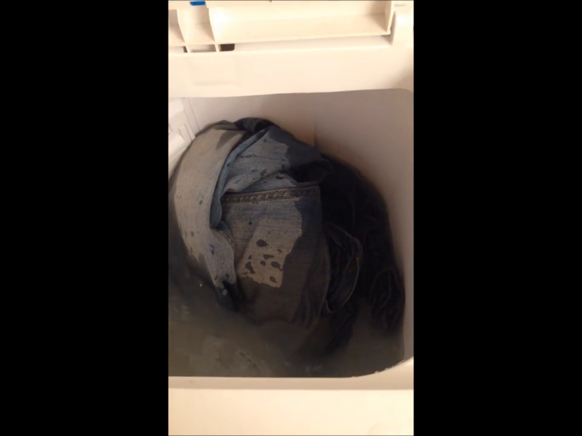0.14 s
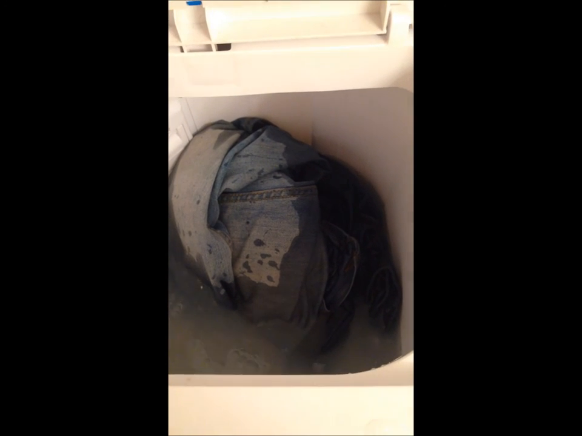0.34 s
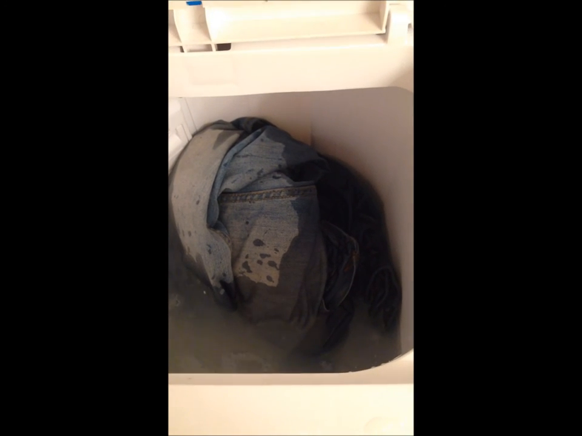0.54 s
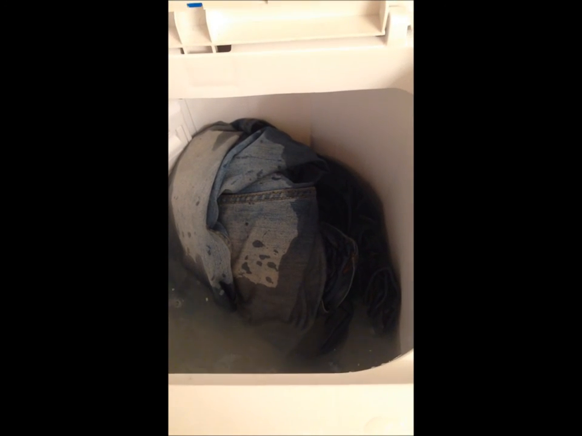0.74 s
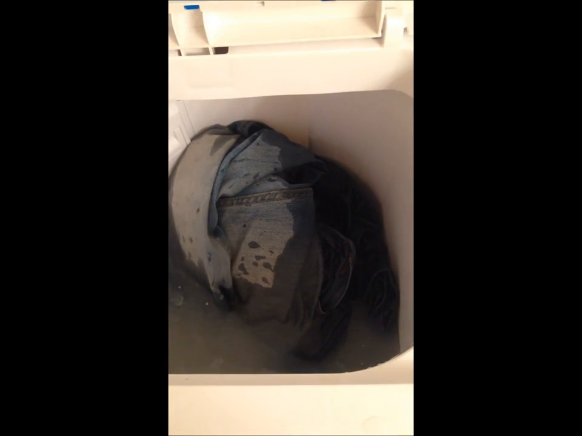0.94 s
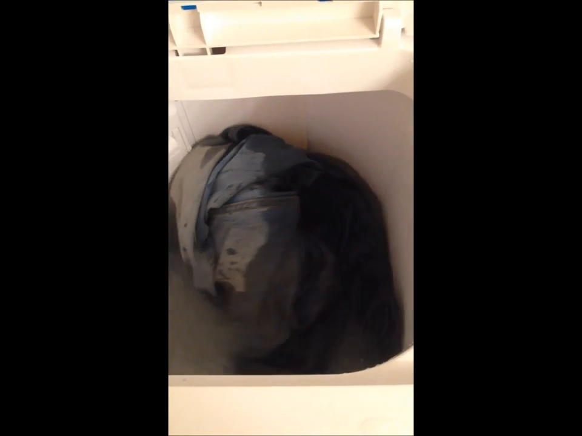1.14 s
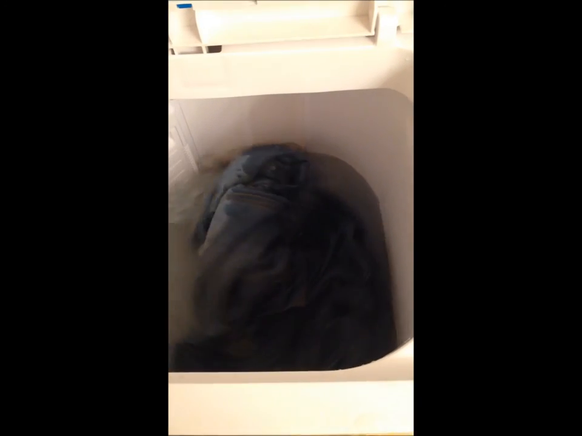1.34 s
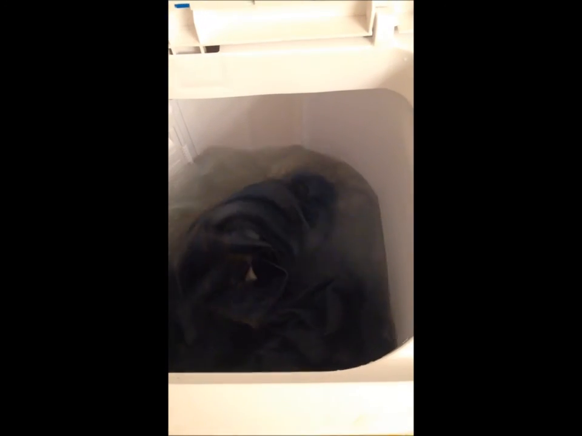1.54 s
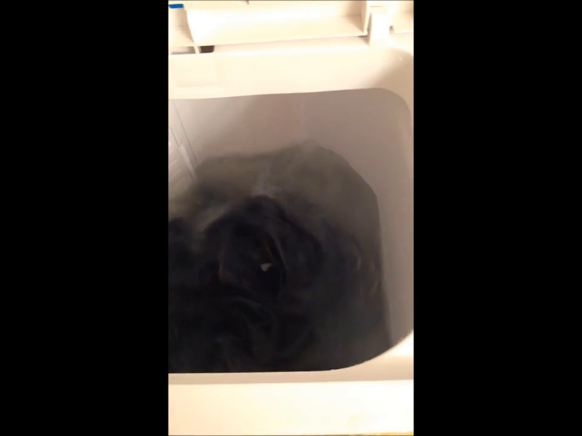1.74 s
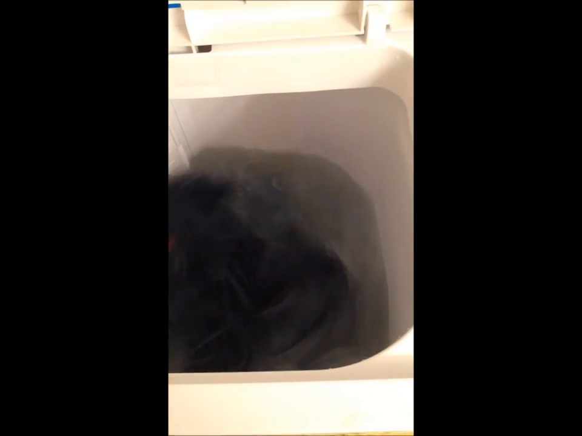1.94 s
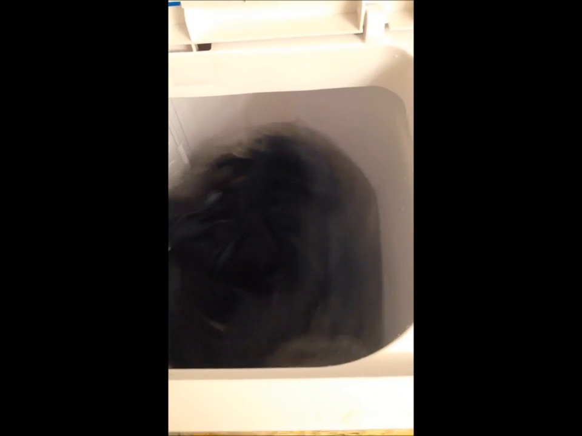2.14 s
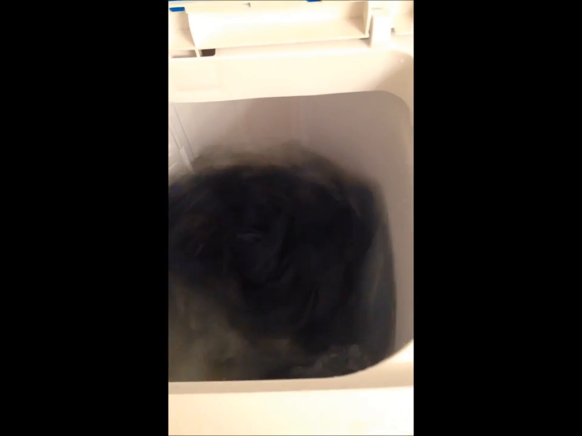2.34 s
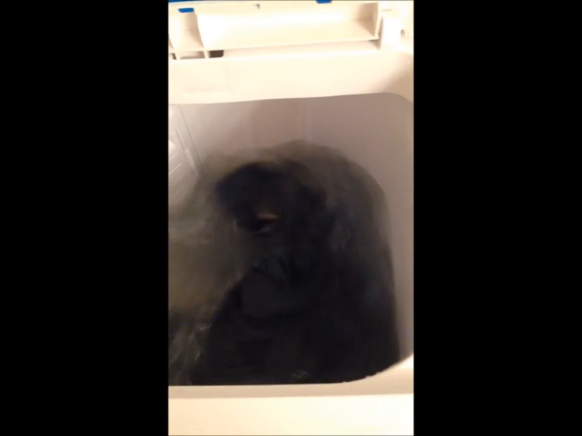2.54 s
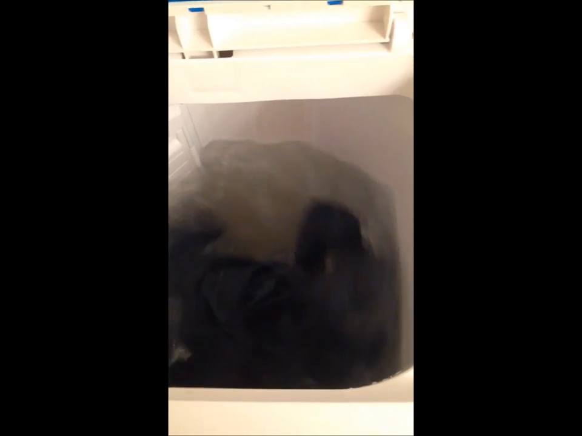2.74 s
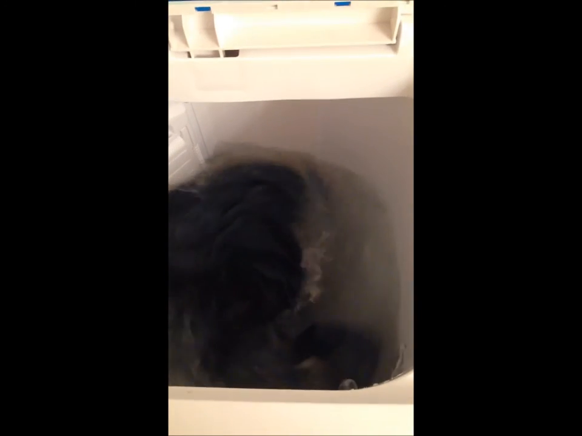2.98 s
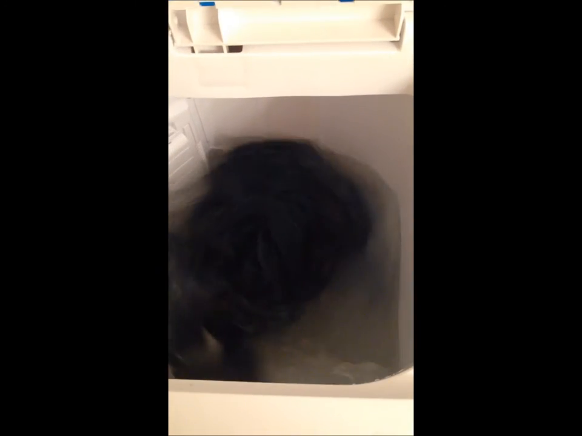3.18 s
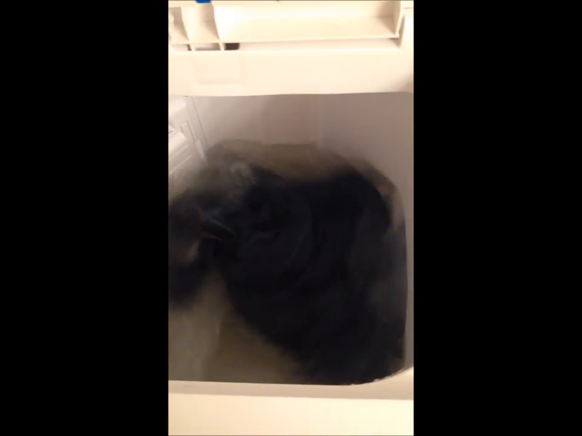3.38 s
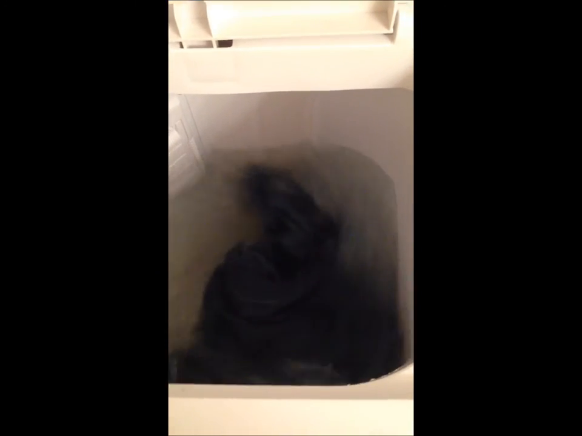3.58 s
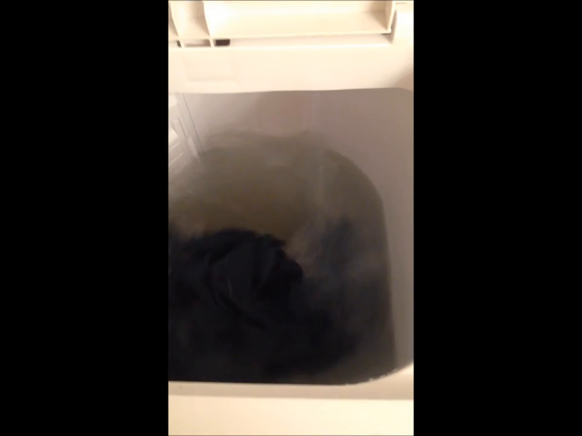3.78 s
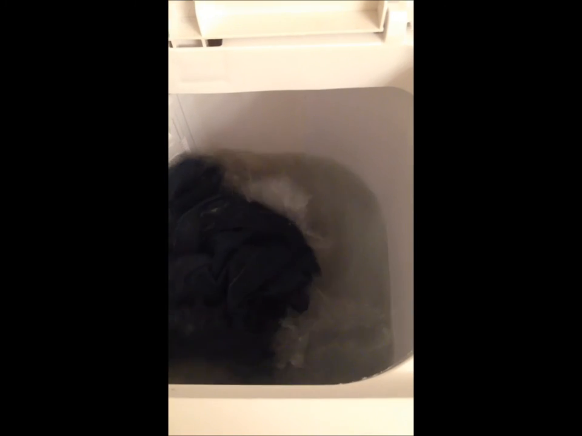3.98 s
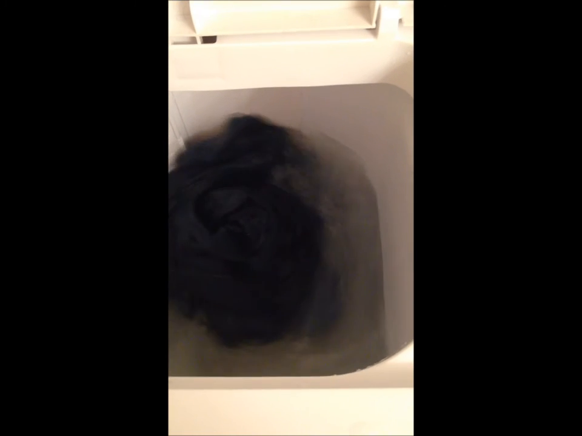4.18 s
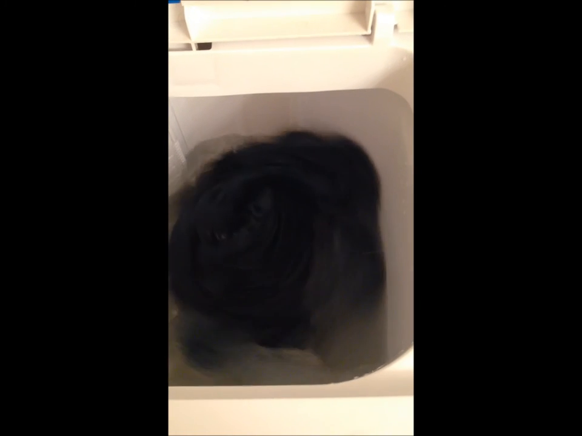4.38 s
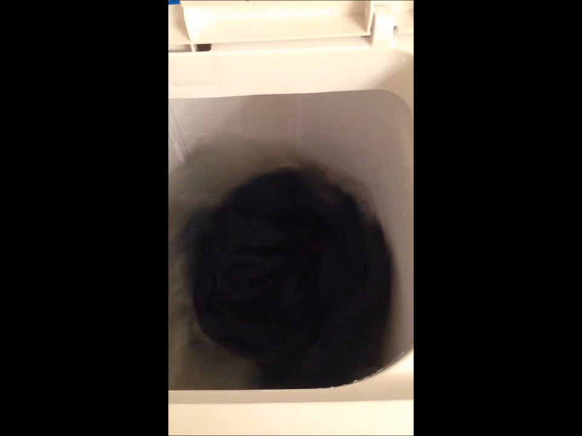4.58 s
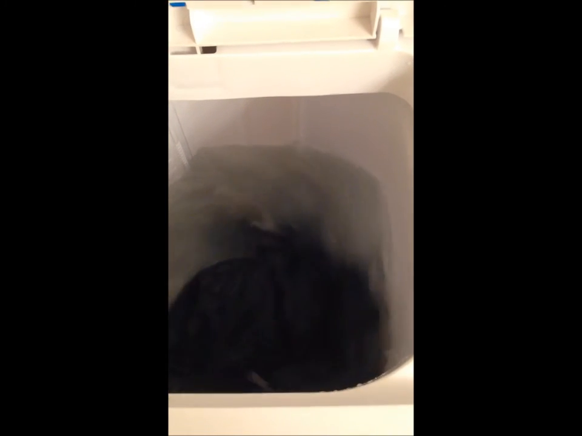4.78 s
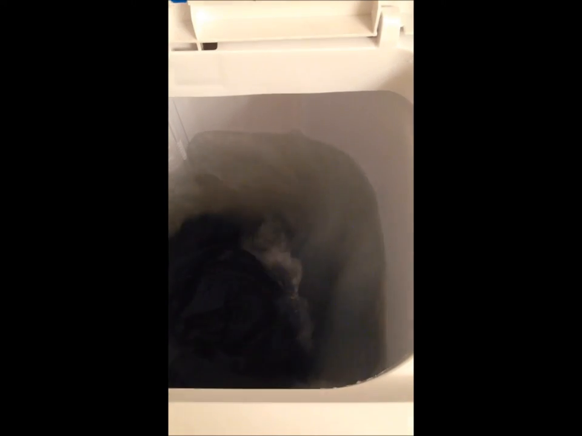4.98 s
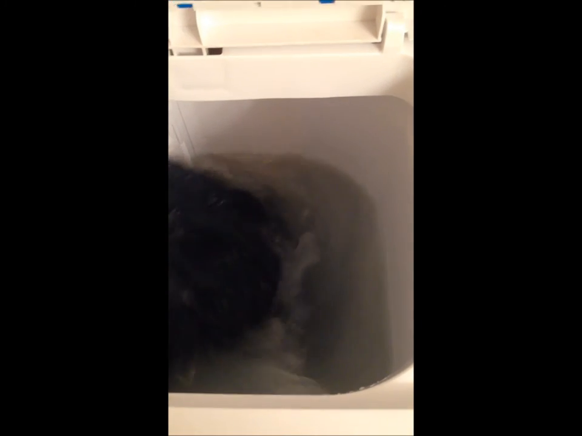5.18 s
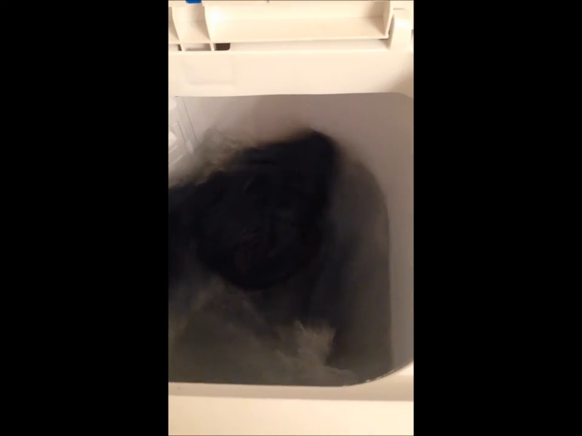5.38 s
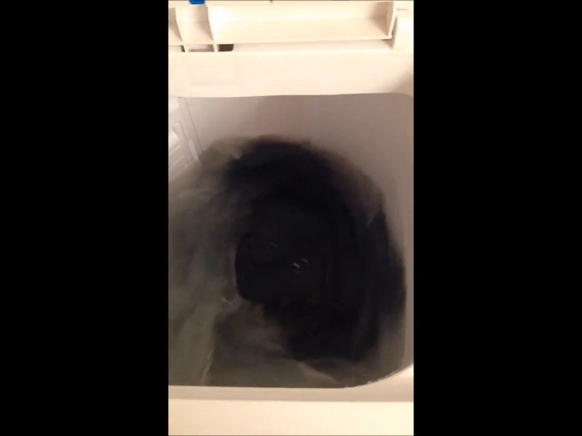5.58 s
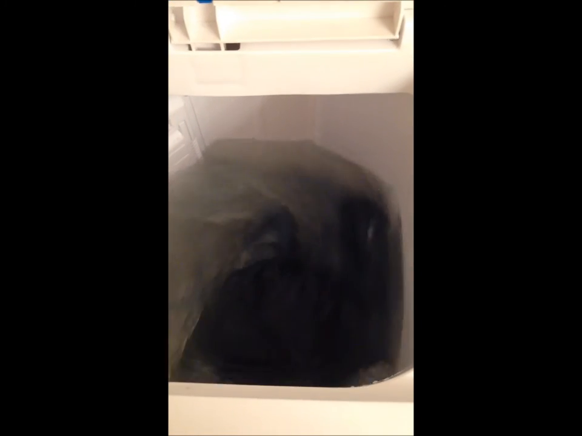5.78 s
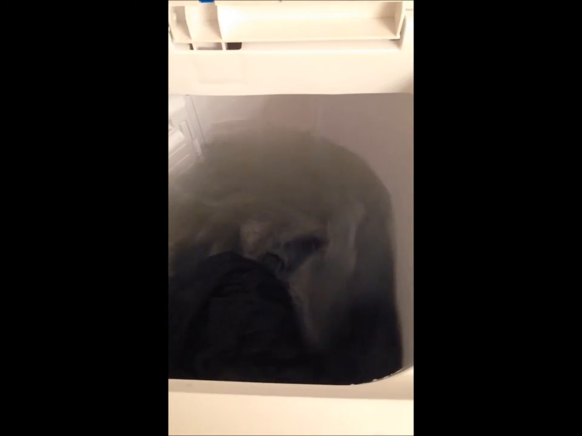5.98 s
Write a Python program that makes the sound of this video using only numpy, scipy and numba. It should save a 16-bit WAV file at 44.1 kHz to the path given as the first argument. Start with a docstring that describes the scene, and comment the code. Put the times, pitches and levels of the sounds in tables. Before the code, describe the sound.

Close, churning water slaps and bubbles in a washer tub over a low motor hum, after a second of quick timer ticking.

```python
"""A small washer indoors, one phone microphone just over the open tub.
At first only the timer ticks in a quiet room. At 1 s its switch clicks, the belt grabs and the motor
starts: mains hum, a rumbling cabinet, wet laundry thumping the wall. From about 1.5 s the churned water
slaps and sprays close below the microphone, its bubbles ringing as gulps and plinks in the plastic tub.
Near 5.8 s the motor cuts out and coasts."""
import sys
import numpy as np
from scipy import signal
from scipy.fft import rfft, irfft, next_fast_len
from scipy.io import wavfile
from scipy.ndimage import uniform_filter1d
from numba import njit

SR = 44100
rng = np.random.default_rng(int(sys.argv[2]) if len(sys.argv) > 2 else 0)


def output_pcm(signal):
    """Save a mono or channel-first signal as 16-bit PCM at the path in sys.argv[1].

    Samples are clipped to [-1, 1] before scaling.
    """
    pcm = np.clip(np.atleast_2d(signal).T, -1, 1) * 32767
    wavfile.write(sys.argv[1], SR, np.round(pcm).astype(np.int16))


N = 265342

# how hard the water churns: time_s, gulp_db, spray_db
CHURN_LEVELS = [(1.0, -59, -62), (1.2, -57.5, -61), (1.55, -62.5, -59.5), (1.72, -52.5, -54),
                (1.8, -48.5, -52), (1.94, -61, -53.5), (2.08, -47, -49), (2.14, -43.5, -40.5),
                (2.2, -48.5, -48.5), (2.23, -53, -43.5), (2.31, -45.5, -42), (2.37, -42, -42),
                (2.43, -44, -42), (2.5, -47, -39.5), (2.65, -42, -39.5), (2.76, -45.5, -44.5),
                (3.0, -42.5, -37), (3.33, -47.5, -47.5), (3.52, -45, -44.5), (3.58, -37, -42),
                (3.625, -44.5, -50.5), (3.67, -45.5, -42), (3.8, -47, -43), (4.04, -44.5, -41.5),
                (4.13, -47.5, -43.5), (4.24, -50, -46.5), (4.3, -51.5, -50.5), (4.37, -51.5, -48),
                (4.44, -47, -43), (4.545, -54.5, -50), (4.63, -43, -42), (4.695, -49, -47.5),
                (4.79, -46, -40.5), (4.87, -47.5, -43.5), (4.93, -47, -48.5), (5.02, -50.5, -41.5),
                (5.2, -44, -40), (5.3, -46, -42.5), (5.46, -45, -42), (5.58, -48, -45.5), (5.84, -45, -41),
                (6.02, -49, -49.5)]
# crowds of larger and of smaller bubbles: frequency_hz, density_db
GULP_SPECTRUM = [(180, -6), (300, -5), (378, -3), (440, -12), (668, -3.5), (760, 4), (973, -3), (1770, 1.5),
                 (2150, -5.5), (2300, -5.5), (2990, -28), (5060, -120)]
SPRAY_SPECTRUM = [(1240, -41), (2100, -36), (2340, -0.5), (2740, 0), (2960, -1), (5080, -0.5), (7710, -17),
                  (11000, -26.5), (14600, -33.5), (15400, -39)]
# single loud bubbles: start_s, level_db, pitch_hz
LOUD_BUBBLES = [(1.5204, -39.5, 5500), (1.578, -39, 5300), (1.59, -32, 1076), (1.622, -35, 4180),
                (1.677, -30, 2540), (1.6973, -39, 4310), (1.7394, -32, 4300), (1.767, -21.5, 5240),
                (1.784, -21.5, 2530), (1.76, -27, 5300), (1.775, -32, 2500), (1.79, -27, 1054),
                (1.797, -26.5, 2750), (1.7917, -23, 1960), (1.804, -21.5, 1510), (1.81, -29, 2560),
                (1.8519, -37, 4130), (1.8816, -28, 4500), (1.956, -37, 4330), (1.972, -28, 3480),
                (2.025, -20, 2810), (2.03, -33, 1120), (2.055, -30, 1080), (2.073, -23.5, 1020),
                (2.081, -19.5, 1560), (2.084, -22.5, 4080), (2.0834, -23, 2540), (2.095, -22, 2150),
                (2.11, -28, 4700), (2.1097, -21.5, 2470), (2.18, -21, 2550), (2.214, -24, 3660),
                (2.236, -17.5, 3020), (2.2768, -20.5, 3580), (2.278, -18, 1740), (2.3493, -20.5, 1800),
                (2.354, -20, 2930), (2.355, -20.5, 705), (2.363, -22, 2630), (2.3933, -14, 3210),
                (2.479, -24.5, 564), (2.5414, -23, 3380), (2.544, -23, 2750), (2.56, -24, 1860),
                (2.638, -23, 3400), (2.665, -25, 3300), (2.69, -28, 900), (2.7, -25, 1650),
                (2.886, -23, 4770), (2.5862, -18, 4140), (2.5855, -23, 1654), (2.6132, -17, 3450),
                (2.635, -27, 780), (2.653, -19, 2570), (2.675, -22.5, 1800), (2.708, -20, 3880),
                (2.717, -20.5, 1140), (2.7573, -11, 3810), (2.7573, -12, 4750), (2.765, -17, 2700),
                (2.762, -21, 1690), (2.79, -28, 690), (2.837, -21.5, 4900), (2.8374, -18.5, 2400),
                (2.839, -23.5, 710), (2.8658, -22, 1760), (2.8906, -17.5, 2700), (2.9182, -16.5, 3380),
                (2.968, -17.5, 3470), (3.02, -19, 4030), (3.021, -18.5, 1134), (3.0417, -14.5, 3060),
                (3.057, -18.5, 2390), (3.065, -14.5, 3600), (3.118, -24, 1190), (3.153, -22.5, 3000),
                (3.159, -26, 1100), (3.116, -22, 2830), (3.1417, -20, 2980), (3.1953, -20.5, 4480),
                (3.216, -21.5, 1470), (3.371, -19.5, 751), (3.4437, -22, 4000), (3.515, -18, 1210),
                (3.5158, -14, 1610), (3.505, -26, 2600), (3.534, -23, 2550), (3.555, -25, 3000),
                (3.605, -28, 1750), (3.636, -24.5, 2740), (3.5865, -21.5, 1660), (3.6682, -20, 3200),
                (3.6709, -17, 1750), (3.73, -20.5, 4820), (3.732, -22, 5600), (3.756, -25, 2740),
                (3.866, -18.5, 1640), (3.923, -22, 2650), (3.981, -18.5, 2490), (3.991, -19.5, 2980),
                (4.014, -17, 3750), (4.0717, -19.5, 5100), (4.083, -21, 3270), (4.101, -24.5, 1173),
                (4.108, -27, 1620), (4.197, -30, 4000), (4.1427, -23, 4020), (4.2142, -25.5, 1680),
                (4.2445, -21.5, 3510), (4.2766, -27, 2970), (4.32, -24.5, 3250), (4.345, -22.5, 4560),
                (4.495, -20, 4500), (4.519, -30, 930), (4.564, -28, 1210), (4.612, -25, 1185),
                (4.638, -25, 4220), (4.644, -28, 654), (4.6582, -19, 5900), (4.717, -22, 746),
                (4.7198, -26, 2390), (4.752, -26, 3470), (4.757, -23.5, 1360), (4.7586, -15.5, 1805),
                (4.785, -19.5, 3090), (4.81, -11, 2750), (4.8387, -16, 2870), (4.914, -22, 776),
                (4.958, -27, 2640), (4.942, -22.5, 3600), (5.032, -26, 1610), (5.0656, -24, 1720),
                (5.1258, -23, 2400), (5.1792, -25, 4800), (5.181, -25, 827), (5.1954, -10, 4380),
                (5.196, -23, 890), (5.221, -25, 860), (5.2456, -24, 5330), (5.248, -24, 800),
                (5.2841, -24.5, 1500), (5.357, -32, 2680), (5.3907, -19, 1930), (5.466, -23, 2750),
                (5.508, -25, 1410), (5.537, -25, 3000), (5.555, -25.5, 2700), (5.57, -29, 4200),
                (5.585, -27, 1790), (5.4011, -15, 2680), (5.422, -19, 2650), (5.44, -21, 1272),
                (5.4503, -14, 4940), (5.626, -19, 3085), (5.633, -22, 2480), (5.6545, -25.5, 1920),
                (5.7754, -17.5, 2720), (5.8283, -21, 2610), (5.834, -16.5, 1606)]
# air pockets rising through the load: start_s, level_db, pitch_hz, climb_hz_per_s, t60_s
AIR_POCKETS = [(1.775, -32, 816, 14000, 0.09), (1.784, -26, 1019, 3000, 0.073),
               (2.028, -38, 1022, 300, 0.14), (2.06, -33.5, 1064, 300, 0.14), (2.37, -37, 800, 500, .08),
               (4.925, -34, 600, 3000, .06), (4.73, -36, 770, 500, .08), (2.065, -37, 760, 500, 0.12),
               (2.402, -33, 514, 7000, 0.081), (2.606, -27, 640, 8100, 0.083),
               (2.908, -30, 580, 8900, 0.069), (2.97, -28.5, 543, 8040, 0.11),
               (3.04, -33, 1150, 3000, 0.069), (3.052, -28, 670, 7000, .06), (3.342, -32, 637, 4000, 0.042),
               (3.39, -34, 844, 3000, 0.038), (3.48, -31, 730, 1000, 0.09), (3.67, -36, 737, 12000, .07),
               (4.595, -33, 680, 7000, 0.082), (4.855, -32.5, 680, 4000, .08),
               (5.272, -34, 1294, 13900, 0.051), (5.33, -31, 764, 8000, 0.057),
               (5.503, -33.5, 1186, 2000, 0.069), (5.94, -31, 744, 3000, .05)]
# water slapping the wall, droplets flicked against the rim: start_s, level_db
WALL_SLAPS = [(1.759, -53), (1.785, -37), (1.8465, -43.5), (2.023, -67), (2.213, -39), (2.2356, -37),
              (2.279, -48), (2.3, -40), (2.311, -42), (2.368, -35.5), (2.3933, -37), (2.435, -42),
              (2.585, -43), (2.7572, -24.5), (2.8338, -31.5), (2.918, -44), (2.924, -47), (2.9999, -64),
              (3.0234, -35), (3.2202, -36), (3.444, -48), (3.4689, -38), (3.517, -39), (3.534, -36),
              (3.558, -43), (3.585, -50), (3.667, -42), (3.729, -41), (3.7712, -57), (3.981, -42),
              (3.99, -44), (4.0715, -41), (4.103, -40), (4.272, -39), (4.494, -43), (4.604, -59),
              (4.656, -32), (4.72, -35), (4.7574, -49), (4.8406, -33.5), (5.1012, -55), (5.179, -50),
              (5.1953, -36), (5.27, -43), (5.448, -41), (5.4855, -39), (5.7526, -54), (5.817, -36),
              (5.894, -40.5)]
RIM_DROPS = [(1.7589, -45), (1.7958, -48), (1.8457, -49), (1.953, -48), (2.0687, -54), (2.142, -58),
             (2.2179, -55), (2.2822, -53), (2.3117, -41), (2.369, -45), (2.593, -34), (2.6648, -41),
             (2.7567, -30), (2.9248, -48), (3.0195, -42), (3.2211, -57), (3.5588, -39), (3.7703, -44),
             (4.1031, -31.5), (4.13, -37), (4.2712, -41), (4.279, -43), (4.4977, -55), (4.6049, -36),
             (4.6568, -41), (4.7192, -36), (4.8425, -37), (5.099, -31.5), (5.4381, -48), (5.4495, -40),
             (5.4859, -48), (5.6231, -41), (5.7528, -41), (5.8157, -38), (5.893, -39), (5.9349, -54),
             (5.9594, -52)]
# the wide slap and the thin, bright droplet: frequency_hz, gain_db
SLAP_SPECTRUM = [(300, 0), (1000, -4.5), (2500, -1), (5000, 11), (7500, -1.5), (11000, -34), (15400, -35)]
DROP_SPECTRUM = [(3000, -30), (6000, -5), (8000, 3), (11000, -8.5), (13000, -13), (15400, -23)]
# cabinet panels, and the whole machine rocking on its feet: pitch_hz, width_hz, level_db
CABINET_MODES = [(149.6, 27.3, 2), (194.4, 23, -2.5), (233.8, 44, -5.5), (342, 69, -13), (118, 28, -2)]
ROCKING_MODES = [(51.7, 23, -3.5), (83.6, 38, 1)]
# belt and fan: frequency_hz, density_db
WHIR_SPECTRUM = [(200, -15), (400, 5), (1200, 2), (3000, -8.5), (6000, -27), (12000, -38)]
# laundry hitting the wall: start_s, level_db
LAUNDRY_BLOWS = [(1.065, -43), (1.339, -44), (2.21, -41), (2.515, -39), (2.624, -37), (3.191, -41),
                 (3.274, -34), (4.165, -41), (4.365, -41), (4.915, -45), (5.21, -50), (5.431, -42),
                 (5.465, -45), (5.572, -38), (5.684, -40)]
# ringing of the tub wall, the escapement and the switch: pitch_hz, level_db, t60_s
WALL_MODES = [(60.4, 10.5, 0.11), (94, 17, 0.057), (152, -15, 0.089)]
TICK_MODES = [(2946, 1, 0.045), (3020, 2, 0.065), (2280, -2, 0.044), (5530, -10, .03)]
SWITCH_MODES = [(950, -5, 0.093), (2270, 3, 0.034), (2570, -6, 0.05), (2910, 2.5, 0.046), (3180, -9, 0.05),
                (3520, -12, 0.035), (5130, -12, 0.12), (5470, -19, .09), (6500, -22, .03), (7500, -29, .03)]
# indoor hush: frequency_hz, density_db
HUSH_SPECTRUM = [(15, -46), (25, -16), (86, 1.5), (304, -2), (420, -16.5), (494, 3.5), (565, 0.5),
                 (759, -5.5), (916, -9.5), (1200, -8), (2050, -11), (2990, -13.5), (5550, -22), (7060, -29),
                 (15400, -31.5)]
# air in the tub ringing with the room: pitch_hz, width_hz, level_db
TUB_AIR_MODES = [(337, 94, -10.5), (756, 88, -12), (1065, 205, -13.5), (5180, 1300, -23.5)]
# appliances further off: pitch_hz, rms_db
DISTANT_HUMS = [(86, -66), (167, -65.5), (194, -68.5), (242, -65), (285, -72), (319, -69)]

SWITCH_S, GRAB_S, TAKE_UP_S, STRAIN_END_S, STOP_S = 0.9858, 1.112, 1.14, 1.4, 5.83
HUM_HZ, HUM_DB, STRAIN_DB, SHAFT_HZ = 120.05, -41, 4.5, 27.5
SPIN_UP_S, COAST_S = 0.07, 0.28
TICK_START_S, TICK_END_S, TICKS_PER_S, TICK_DB = 0.011, 1.33, 18, -56.5
TIME_S = np.arange(N) / SR


def water():
    """Agitated water just below the microphone, direct and echoed by the tub."""
    gulps, spray = churn()
    direct = gulps + spray + bubbles() + splashes() + glugs()
    echoes = shaken(tub_echoes(direct), rate_hz=350)
    return (TIME_S > SWITCH_S) * (direct + undb(-5) * echoes)


def churn():
    """Trapped air rings as low gulps and bright spray, both surging together."""
    time_s, *levels_db = np.transpose(CHURN_LEVELS)
    gulp_gain, spray_gain = (undb(np.interp(TIME_S, time_s, db)) for db in levels_db)
    surge = undb(2.2 * walk(35) + 1.25 * walk(12))
    gulps = swarm(GULP_SPECTRUM, surge, count=4500, cycles=21.4, spread_db=2, hiss_db=-1.5)
    spray_surge = surge * thrown_spray() * undb(1.16 * walk(70))
    spray = swarm(SPRAY_SPECTRUM, spray_surge, count=32000, cycles=11, spread_db=4, hiss_db=-5)
    return gulp_gain * gulps, spray_gain * spray


def swarm(spectrum, surge, count, cycles, spread_db, hiss_db):
    """A crowd of ringing bubbles over their own blur, swelling with the surge; rms 1."""
    when, pitch, strength, length = rng.random((count, 4)).T
    low_hz, high_hz = spectrum[1][0], spectrum[-2][0]
    hz = low_hz * (high_hz / low_hz) ** pitch
    gain = undb(-spread_db * np.log(1 - .98 * strength)) * np.sqrt(hz)
    t60_s = cycles * (0.12 + length ** 2) / hz  # mostly short crackles, a few clear plinks
    crowd = ring(when * N / SR, hz, t60_s, gain, glide=0.28, rise_cycles=0.95)
    blur = undb(0.33 * walk(40)) * rng.standard_normal(N)
    return level(surge * (level(colour(crowd, spectrum)) + level(colour(blur, spectrum), hiss_db)))


def thrown_spray(boost_db=39.5, rise_s=0.0027, fall_s=0.012):
    """Each slap throws up spray that falls back: a gain, 1 between slaps."""
    start_s, db = np.transpose(WALL_SLAPS)
    age_s = TIME_S - start_s[:, None]
    swell = (1 - np.exp(-np.maximum(age_s, 0) / rise_s)) * np.exp(-np.abs(age_s) / fall_s)
    return 1 + np.sum(undb(db + boost_db)[:, None] * swell, axis=0)


def bubbles(litter_count=10, litter_s=0.024, litter_octaves=0.84):
    """Each loud bubble cracks the surface and rings, with a litter of fainter ones near its pitch."""
    start_s, db, hz = np.transpose(LOUD_BUBBLES)
    t60_s = 0.036 * (hz / 1000) ** -0.52  # small, high bubbles die sooner
    climb = 0.15 + 0.18 * (704 / hz) ** 2  # big, low ones climb most as they neck off
    crack = ring(start_s, 1.27 * hz, 4.7 / hz, undb(db - 11), glide=0.086, rise_cycles=0.22)
    plink = ring(start_s - 0.8 / hz, hz, t60_s, undb(db - 5.5), glide=climb, rise_cycles=2.12)
    lag, pitch = rng.random((len(start_s), litter_count, 2)).T
    litter_hz = hz * 2 ** (litter_octaves * (pitch - .45))
    litter_gain = undb(db - 16 - 12.8 * lag)
    litter = ring(start_s + litter_s * lag, litter_hz, 0.56 * t60_s, litter_gain,
                  glide=0.31, rise_cycles=1.2)
    return crack + shaken(plink, rate_hz=800) + litter


def splashes():
    """Water slaps the wall and droplets tick on the rim, each a click and a puff of noise."""
    slaps = burst(*np.transpose(WALL_SLAPS), rise_s=0.00047, fade_s=0.0054, click=3.3)
    drops = burst(*np.transpose(RIM_DROPS), rise_s=0.00097, fade_s=0.0032, click=2.1)
    return colour(slaps, SLAP_SPECTRUM) + colour(drops, DROP_SPECTRUM)


def glugs():
    """Air pockets ring up slowly and climb in pitch as they shrink, wobbling as they rise."""
    start_s, db, hz, climb_hz_per_s, t60_s = np.transpose(AIR_POCKETS)
    pockets = ring(start_s, hz, t60_s, undb(db), glide=climb_hz_per_s * t60_s / hz, rise_cycles=4.5)
    return shaken(pockets, rate_hz=130)


def tub_echoes(direct, patterns=12, shift_hz=25.047, t60_s=0.023):
    """Short echoes off the tub walls; the heaving water keeps changing their pattern."""
    t = np.arange(int(.15 * SR)) / SR
    shares = np.array([walk(shift_hz) for _ in range(patterns)])
    shares /= np.linalg.norm(shares, axis=0)
    echoes = (t > .0015) * rng.standard_normal((patterns, len(t))) * undb(-60 * t / t60_s)
    echoes /= np.linalg.norm(echoes, axis=1, keepdims=True)
    return sum(signal.fftconvolve(direct * share, echo)[:N] for share, echo in zip(shares, echoes))


def motor_hum():
    """Magnetic pull at twice the mains rate, stronger while the motor gets the load moving."""
    field = fade_in(TAKE_UP_S, 0.01) * die_away(STOP_S, 0.02)  # collapses as the switch opens
    strain_db = STRAIN_DB * (1 - fade_in(STRAIN_END_S, 0.0067))
    shifting_load_db = -0.9 * walk(5.1) + 0.5 * walk(30)
    shaft_turns = np.cumsum(SHAFT_HZ * (1 + 0.03 * walk(3.05))) / SR
    throb = 1 + 0.24 * np.sin(2 * np.pi * shaft_turns)  # the rotor runs a little out of true
    phase = 2 * np.pi * HUM_HZ * TIME_S
    tone = np.sqrt(2) * (np.sin(phase) + undb(-29.5) * np.sin(2 * phase))
    return undb(HUM_DB + strain_db + shifting_load_db) * field * throb * tone


def belt_drive():
    """The belt grabs with a sinking groan; whir and shaking build up and die with the speed."""
    speed = (1 - die_away(SWITCH_S, SPIN_UP_S)) ** 2 * die_away(STOP_S, COAST_S)
    whir = level(colour(rng.standard_normal(N), WHIR_SPECTRUM), -57)
    rumble = undb(-50.5) * resonant_noise(CABINET_MODES, flicker_db=4)
    rocking = undb(-53.5) * resonant_noise(ROCKING_MODES, flicker_db=1.5)
    groan = ring(GRAB_S, hz=188, t60_s=0.16, gain=undb(-32), glide=-0.27, rise_cycles=2.1)
    return groan + speed * (rumble + rocking + whir)


def laundry_thumps():
    """Soft blows of the wet load swing the tub wall for a few cycles."""
    start_s, db = np.transpose(LAUNDRY_BLOWS)
    return sum(ring(start_s + 0.0049, hz, t60_s, undb(db + mode_db), rise_cycles=1.2)
               for hz, mode_db, t60_s in WALL_MODES)


def timer_ticks(sink_per_s=0.063):
    """Even clockwork, slowly sinking in pitch; the escapement falls back with a weaker knock."""
    start_s = np.arange(TICK_START_S, TICK_END_S, 1 / TICKS_PER_S)
    sinking = 1 - sink_per_s * (start_s - TICK_END_S / 2)
    ticks = np.zeros(N)
    for hz, db, t60_s in TICK_MODES:
        pitch_hz = hz * (sinking + 0.017 * rng.standard_normal(len(start_s)))
        gain = undb(TICK_DB + db + 0.7 * rng.standard_normal(len(start_s)))
        ticks += ring(start_s, pitch_hz, t60_s, gain, rise_cycles=7.5)
    ticks = shaken(ticks, rate_hz=120)
    return ticks + undb(-8) * delayed(ticks, 0.024)


def timer_switch():
    """The switch snaps, bounces twice and rattles the plastic housing."""
    hz, db, t60_s = np.transpose(SWITCH_MODES)
    snap = ring(SWITCH_S, hz, t60_s, undb(db - 43.5))
    bounces = 0.75 * delayed(snap, 0.0031) + 0.3 * delayed(snap, 0.02)
    rattle = burst([SWITCH_S], db=-40.5, rise_s=0.0011, fade_s=0.022)
    return snap + bounces + band(band(rattle, 2400, 3400), 2700, 3600)


def room_tone():
    """Indoor hush, the air in the tub ringing with it, and faint appliances further off."""
    hush = level(colour(rng.standard_normal(N), HUSH_SPECTRUM), -55)
    tub_air = undb(-50.5) * resonant_noise(TUB_AIR_MODES, flicker_db=0.5)
    hums = sum(np.sqrt(2) * undb(db + 0.82 * walk(6.8)) * np.sin(2 * np.pi * hz * TIME_S)
               for hz, db in DISTANT_HUMS)
    return hush + tub_air + hums


def ring(start_s, hz, t60_s, gain, glide=0., rise_cycles=0.72):
    """One damped sine per entry; glide is the share of pitch gained over its life."""
    columns = np.broadcast_arrays(start_s, hz, t60_s, gain, glide)
    return add_rings(*(1. * column.ravel() for column in columns), rise_cycles)


@njit
def add_rings(start_s, hz, t60_s, gain, glide, rise_cycles):
    """Sums the damped sines, each with a soft onset."""
    out = np.zeros(N)
    for k in range(len(start_s)):
        start, life = int(start_s[k] * SR), int(t60_s[k] * SR)
        decay, onset_decay = np.exp(-np.log(1000.) / life), np.exp(-hz[k] / (rise_cycles * SR))
        amplitude, held_back, phase = gain[k], 1., 0.
        for i in range(min(life, N - start)):
            phase += 2 * np.pi * hz[k] * (1 + glide[k] * i / life) / SR
            amplitude *= decay
            held_back *= onset_decay
            out[start + i] += amplitude * (1 - held_back) * np.sin(phase)
    return out


def shaken(x, rate_hz, phase_rad=1.1, strength_db=2):
    """Makes a ring ragged by jolting its phase and strength at random."""
    jolt = np.exp(1j * phase_rad * level(walk(rate_hz))) * undb(strength_db * level(walk(rate_hz)))
    return np.real(signal.hilbert(x, next_fast_len(N))[:N] * jolt)


def burst(start_s, db, rise_s, fade_s, click=0.):
    """White noise that swells and dies at each start, with an optional click in front."""
    hits = np.zeros(N)
    hits[(np.asarray(start_s) * SR).astype(int)] = undb(db)
    t = np.arange(int(.08 * SR)) / SR
    envelope = (1 - np.exp(-t / rise_s)) * np.exp(-t / fade_s)
    return signal.fftconvolve(hits, envelope)[:N] * rng.standard_normal(N) + click * hits


def resonant_noise(modes, flicker_db):
    """Separate noise in each resonance, each flickering alone."""
    out = np.zeros(N)
    for hz, width_hz, db in modes:
        mode = band(band(rng.standard_normal(N), hz, width_hz), hz, width_hz)
        out += level(mode, db) * undb(flicker_db * walk(12))
    return out


def colour(x, spectrum):
    """Filters by a curve of frequency_hz, gain_db."""
    hz, db = np.transpose(spectrum)
    size = next_fast_len(N)
    bins_hz = np.maximum(np.arange(size // 2 + 1) * SR / size, 1)
    gain = undb(np.interp(np.log(bins_hz), np.log(hz), db))
    return irfft(rfft(x, size) * gain, size)[:N]


def band(x, hz, width_hz):
    """One resonance, gain 1 at the centre."""
    return signal.lfilter(*signal.iirpeak(hz, hz / width_hz, fs=SR), x)


def walk(rate_hz):
    """Smooth random drift around zero, rate_hz new values a second."""
    hold = int(SR / rate_hz)
    steps = np.repeat(rng.standard_normal(N // hold + 1), hold)
    return 0.82 * uniform_filter1d(uniform_filter1d(steps, hold), hold)[:N]


def fade_in(centre_s, width_s):
    return .5 + .5 * np.tanh((TIME_S - centre_s) / width_s / 2)


def die_away(start_s, fade_s):
    return np.exp(-np.maximum(TIME_S - start_s, 0) / fade_s)


def delayed(x, delay_s):
    return np.roll(x, int(delay_s * SR))


def level(x, rms_db=0):
    return x * undb(rms_db) / np.sqrt(np.mean(x ** 2))


def undb(db):
    return 10 ** (np.asarray(db) / 20)


def scene():
    """Washer and room from just over the tub, in mono."""
    washing = motor_hum() + belt_drive() + laundry_thumps() + water()
    return (washing + timer_ticks() + timer_switch() + room_tone())[None]


def record(dry):
    """The phone cuts the treble above 15.5 kHz."""
    return signal.sosfilt(signal.ellip(10, .2, 80, 15500, fs=SR, output="sos"), dry)


dry = scene()
out = record(dry)
output_pcm(out)
```